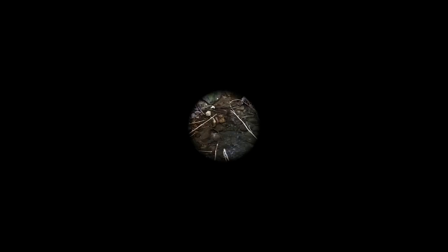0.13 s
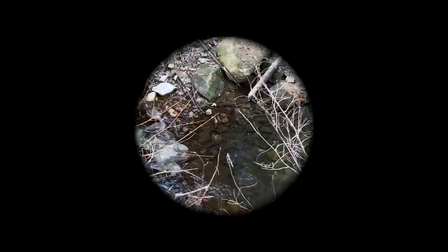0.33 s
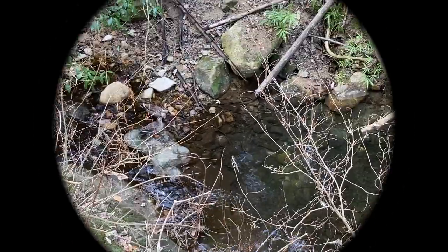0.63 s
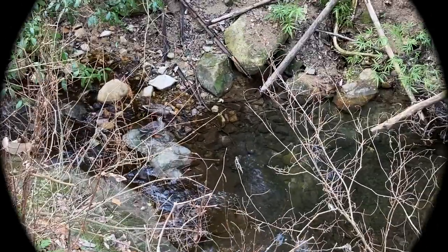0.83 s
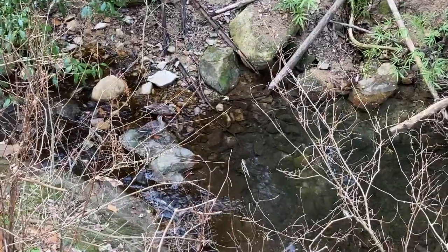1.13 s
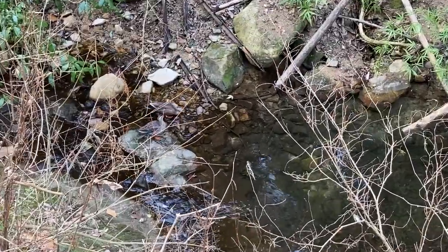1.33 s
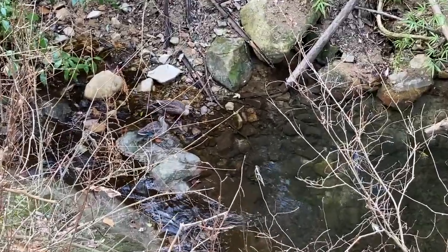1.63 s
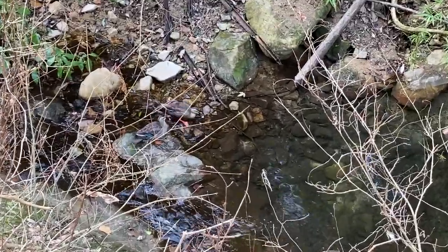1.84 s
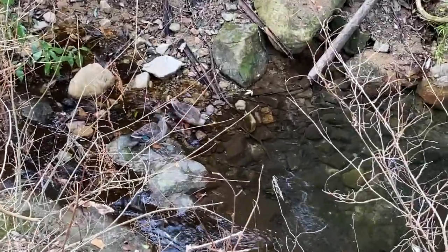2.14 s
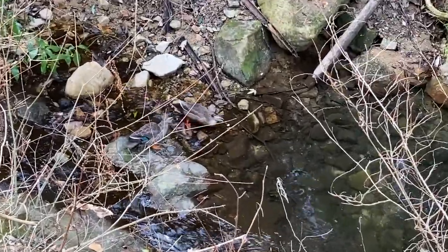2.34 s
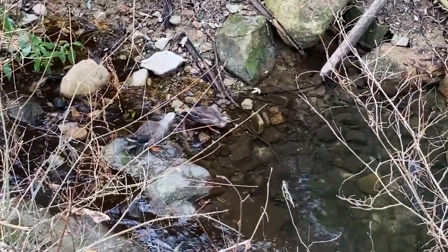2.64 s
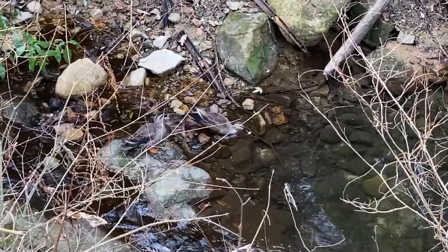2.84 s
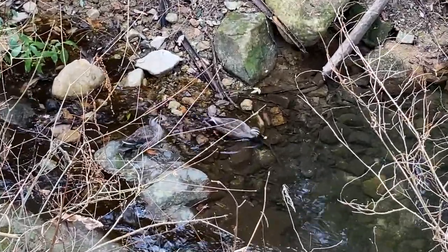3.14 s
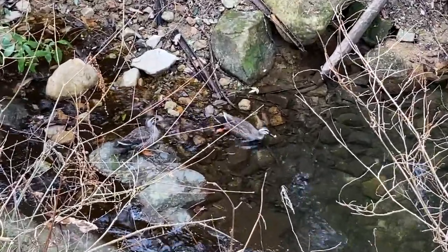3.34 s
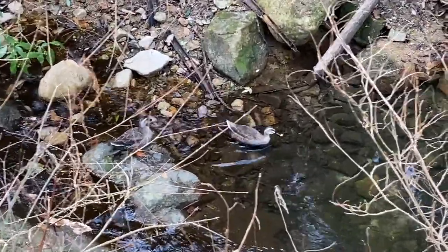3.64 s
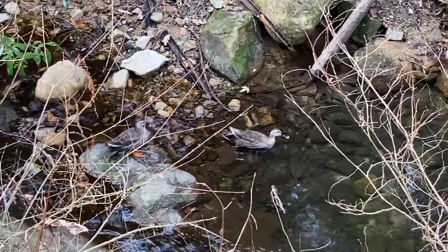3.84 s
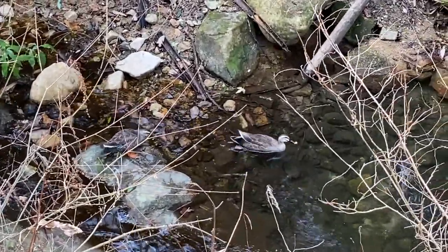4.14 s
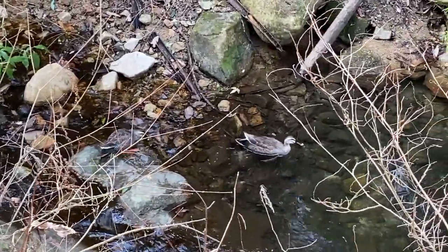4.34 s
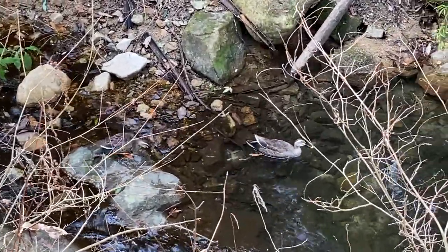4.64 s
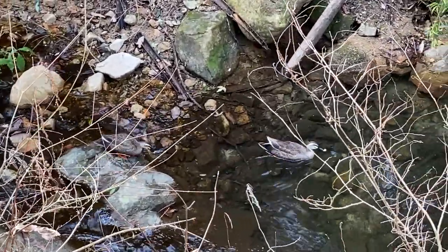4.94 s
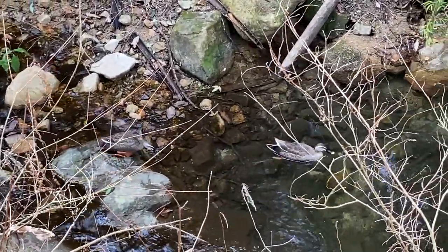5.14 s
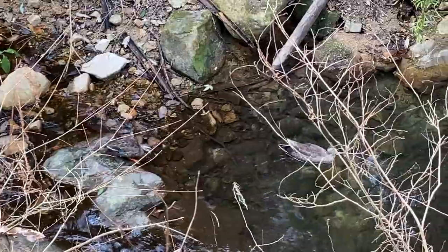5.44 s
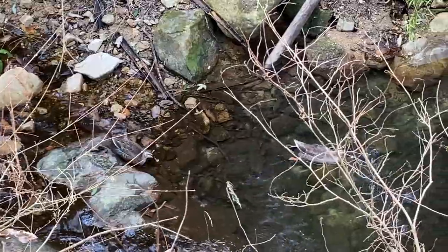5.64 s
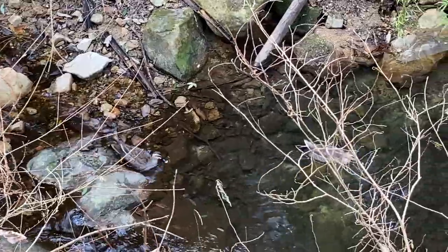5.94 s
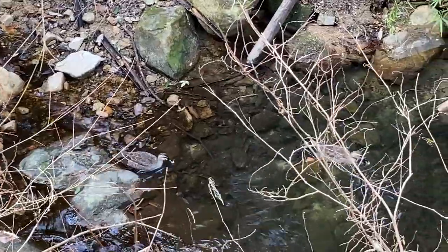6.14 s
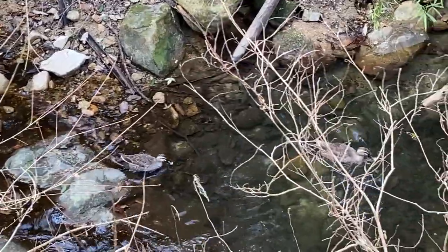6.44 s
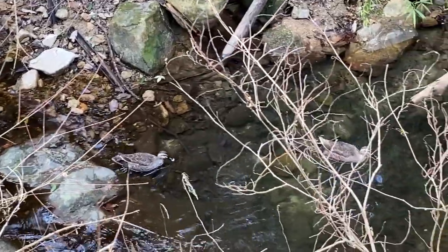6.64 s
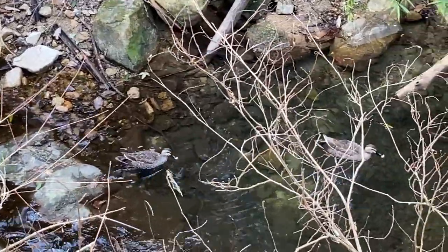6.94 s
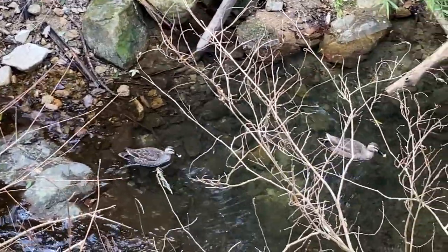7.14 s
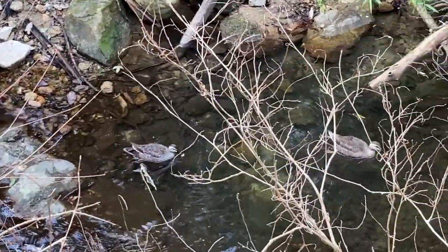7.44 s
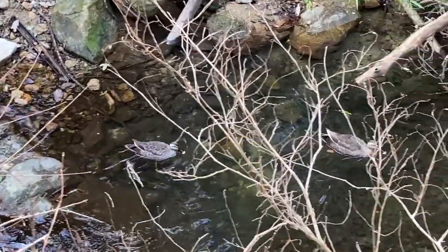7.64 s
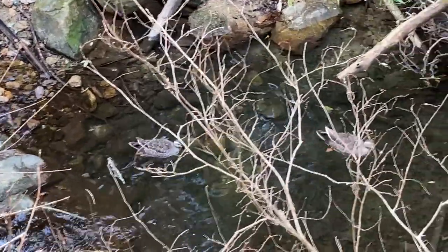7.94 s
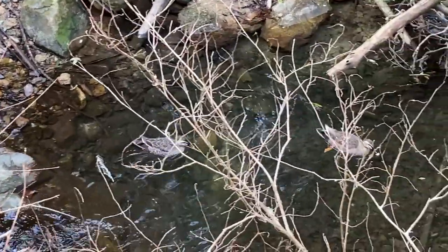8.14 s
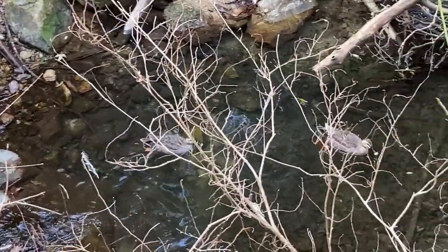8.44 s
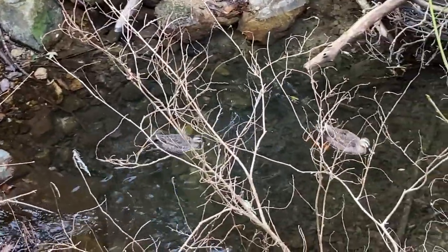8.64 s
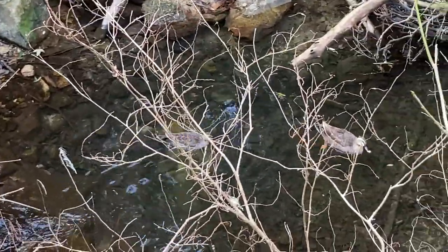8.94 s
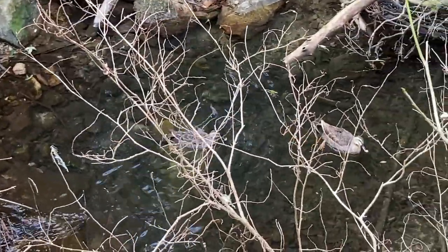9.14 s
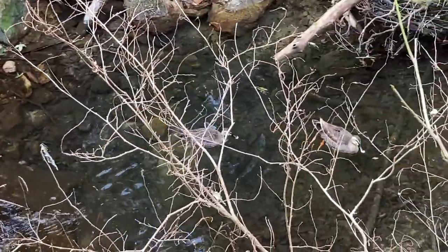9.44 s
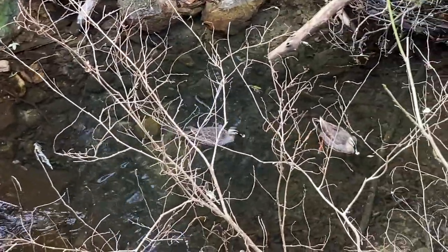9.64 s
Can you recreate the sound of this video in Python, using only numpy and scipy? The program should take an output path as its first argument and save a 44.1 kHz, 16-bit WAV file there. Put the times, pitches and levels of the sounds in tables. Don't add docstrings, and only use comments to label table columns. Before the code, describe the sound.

Water babbles and hisses over rocks, bubbles plopping and drops snapping, as a near bird chirps sharply and later gives a harsh cry.

```python
import sys
import numpy as np
from scipy import signal
from scipy.fft import rfft, irfft, next_fast_len
from scipy.io import wavfile
from scipy.ndimage import uniform_filter1d

SR = 44100
rng = np.random.default_rng(int(sys.argv[2]) if len(sys.argv) > 2 else 0)


def wav_record(signal):
    frames = np.transpose(np.atleast_2d(signal))
    bounded = np.clip(frames, -1, 1)
    quanta = np.round(bounded * 32767).astype(np.int16)
    wavfile.write(sys.argv[1], SR, quanta)


def invert_db(x):
    u = np.asarray(x, float) / 20
    return 10 ** u


N = 431298
TIME_S = np.arange(N) / SR

RUSH_DB, SPRAY_DB, HOLLOW_DB, WIND_DB = -42, -45.5, -43, -61
START_S, FADE_S, FADE_CURVE = 0.045, 4.51, 0.94
TRICKLE_HZ, TRICKLE_WIDTH_HZ = 2485, 960
HOLLOW_HZ, HOLLOW_WIDTH_HZ = 265.3, 23.5
HOLLOW_EVENNESS = 0.33
GULP_S = 0.032
CHIRP_PEAK_AT, CHIRP_SWELL = 0.31, 0.75
ARCH_HZ = 70
WOOD_T60_S = 0.45
WIND_LUMP_DB = 3
CUTOFF_HZ = 15750

# pitch_hz, density_db [dB per Hz]
RUSH_COLOUR = [(25, -36), (60, -11), (120, -5.5), (200, 0), (400, -7.5), (600, 1), (760, -3), (1100, 2.5),
               (2500, -1.5), (3050, -4), (4000, -1), (5200, -6)]
# pitch_hz, density_db [dB per Hz]
SPRAY_COLOUR = [(3000, -40), (5200, -1), (6500, 1.5), (9000, 7.5), (12500, -9.5), (14000, -1), (15700, 8.5)]
# start_s (centre), length_s, level_db
SURGES = [(.2, 0.25, -1), (1.24, 0.15, 1), (1.6, 0.4, 2), (2.42, 0.33, 2), (2.9, 0.084, 0.5),
          (3.27, 0.23, 2), (4.1, 0.06, 0.5), (4.38, 0.064, -1), (4.58, 0.043, -0.5), (5.0, 0.057, 1.5),
          (5.3, 0.064, 1), (5.8, 0.32, -1), (6.12, 0.075, 1), (6.5, 0.36, 0.5), (7.0, 0.037, 1),
          (7.2, 0.22, 0), (7.75, 0.17, 2), (8.23, 0.071, 1), (8.45, 0.077, 0), (8.77, 0.034, 3),
          (9.2, 0.14, 0.5), (9.7, 0.092, -0.5)]
# start_s, level_db
TRICKLE_LEVEL = [
    (0, -54),
    (.8, -54),
    (2.4, -62),
    (4.6, -50),
    (5.4, -46.5),
    (7.4, -40),
    (8.7, -37.5),
    (9.78, -37),
]
# start_s (centre), level_db
GULPS = [(2.33, 9.5), (3.33, 9), (4.1, 3.5), (5.17, 4), (5.5, 5), (5.78, 8), (6.24, 4), (6.36, 5.5),
         (6.6, 5.5), (7.42, 2), (7.92, 8), (8.19, 6), (8.72, 0.5), (8.83, 9), (8.92, 5.5), (9.27, 8.5),
         (9.4, 4), (1.54, 10), (3.2, 6), (4.64, -1), (5.04, 2.5), (5.25, 2), (5.64, 3.5), (6.74, 6.5),
         (7.12, 0), (8.47, 7.5), (8.6, 3), (8.77, 6.5), (9.05, 4.5), (9.54, 5)]
# start_s (centre), level_db
CHOKES = [(3.26, -6), (4.94, -25), (5.91, -3), (6.12, -18), (8.06, 3), (9.18, -8), (2.7, -6), (4.23, -5),
          (5.57, 0), (5.72, -9), (6.29, -3), (6.5, -5), (6.69, -8), (7.8, 3), (8.41, -6), (8.52, -8),
          (9.0, -1), (9.7, -7)]
# start_s, level_db (peak),
# pitch_hz
PLOPS = [(3.26, -26, 1440), (4.049, -30, 1190), (4.359, -23, 604), (4.559, -30, 610), (4.924, -25, 2160),
         (5.067, -23, 620), (6.044, -29, 1960), (6.636, -25, 1060), (6.997, -24, 1085), (7.599, -23, 2180),
         (7.783, -32, 1060), (8.235, -23.5, 1330), (8.922, -26, 1610), (9.558, -26, 1550),
         (3.695, -33, 500), (3.985, -32, 656), (4.684, -31, 780), (5.373, -36, 550),
                (5.62, -36, 605), (5.655, -33, 605), (6.27, -32, 542), (6.384, -29, 840), (6.531, -31, 563),
                (6.604, -33, 650), (6.951, -31, 600), (7.086, -34, 550), (7.463, -29, 560),
                (7.565, -34, 597), (7.661, -33, 660), (8.205, -29, 670), (8.264, -30, 605),
                (8.407, -28, 775), (8.434, -37, 550), (8.754, -33, 605), (8.766, -32, 820),
                (8.828, -32, 605), (9.366, -31, 605), (9.453, -37, 605),
         (1.2, -34, 2100), (3.968, -37, 2100), (3.992, -33, 2500), (4.523, -33, 2480),
                (4.727, -28, 1000), (4.851, -30, 1180), (5.151, -32, 1005), (5.337, -28, 1925),
                (5.368, -30, 2670), (6.122, -31, 950), (6.162, -23, 2840), (6.349, -26, 2155),
                (6.667, -29, 1410), (7.168, -23, 2480), (7.185, -31, 1465), (7.293, -30, 1065),
                (7.404, -31, 1005), (7.729, -26, 1925), (8.495, -29.5, 1130), (8.733, -22, 2140),
                (9.275, -26, 2020), (9.295, -22, 2500), (9.369, -24, 1640), (9.421, -31, 2785)]
# start_s, level_db (peak), pitch_hz
DRIPS = [
    (2.035, -34, 5500),
    (3.078, -34, 1800),
    (3.245, -30, 2150),
    (3.262, -35, 1800),
    (3.285, -33, 2140),
    (3.315, -33, 2000),
    (3.27, -32, 2130),
    (3.415, -39, 963),
    (5.236, -24, 5600),
    (9.7, -41, 5200),
]
# start_s, level_db (peak), pitch_hz
SNAPS = [(1.3594, -40, 8100), (2.315, -27, 8600), (2.4246, -24, 8400), (3.3493, -24, 6860),
         (4.277, -24, 8960), (5.0564, -25, 7700), (6.0177, -21, 9600), (6.771, -22, 8760),
         (8.244, -19, 7900), (8.3492, -17, 7900), (8.4467, -25, 7270), (8.739, -23, 7500)]
# start_s, level_db (peak), pitch_hz
TICKS = [(0.413, -56, 15400), (1.3528, -42, 14500), (1.8876, -42, 15100), (1.9664, -43, 15500),
         (2.1849, -40, 15200), (2.5277, -31, 14700), (2.6878, -38, 15200), (2.7576, -35, 15100),
         (3.1464, -39, 15200), (3.2789, -35, 12800), (3.9489, -36, 15600), (3.9993, -37, 15500),
         (4.1555, -36, 13000), (4.6583, -35, 12700), (5.6451, -33, 15400), (5.8391, -34, 15300),
         (6.3314, -36, 15200), (6.3719, -40, 13000), (6.77, -31, 15300), (6.9965, -32, 14900),
         (7.5854, -35, 15400), (8.5535, -35.5, 15200), (9.0698, -33, 15600), (9.2174, -36, 14700),
         (9.6245, -29, 15400)]
# start_s, length_s, first_hz, last_hz, level_db
CHIRPS = [(3.033, .014, 3120, 3200, -46), (3.042, 0.026, 3340, 3410, -37),
          (3.076, 0.022, 3430, 3340, -28.5), (3.1, .008, 3320, 3300, -37), (3.109, .011, 3200, 3150, -39),
          (3.14, .035, 3390, 3400, -47), (6.816, 0.051, 3300, 3400, -32), (6.85, .012, 2950, 3120, -29),
          (6.862, 0.019, 3160, 3360, -17.5), (6.878, 0.048, 3390, 3420, -18.5),
          (6.923, 0.0072, 3400, 3400, -26), (6.94, .009, 3390, 3350, -21), (6.947, 0.015, 3340, 3220, -27),
          (6.959, 0.0097, 3280, 3430, -32), (8.504, 0.039, 3700, 3740, -40)]
# start_s, pitch_hz, level_db
CRY = [
    (7.52, 4120, -44),
    (7.67, 4150, -36.5),
    (7.72, 4060, -33.5),
    (7.8, 4110, -30.5),
    (7.88, 4030, -34),
    (7.979, 4120, -28),
    (8.06, 4015, -27.5),
    (8.13, 4020, -49),
    (8.27, 4076, -39.5),
]
# multiple [of the loudest partial], level_db
CHIRP_PARTIALS = [(1, 4.5), (1.5, -22), (2, -17), (3, -21), (3.5, -20), (4, -22)]
# multiple [of the loudest partial], level_db
CRY_PARTIALS = [(1, 4), (1.5, -10), (2, -8.5), (2.5, -15), (3, -13)]
# start_s, lag_turns
PERCH = [
    (3.2, -.16),
    (6.8, 0.085),
    (7.0, 0.067),
    (7.5, -0.032),
]
# start_s, length_s, first_hz, last_hz, level_db
FAR_NOTES = [(1.82, 0.11, 3450, 3520, -51), (1.9, 0.06, 4400, 4460, -50), (2.03, .07, 4400, 4430, -54),
             (2.37, 0.09, 4800, 4800, -48), (3.163, 0.058, 4420, 4450, -46),
             (3.42, 0.13, 3930, 3910, -48.5), (3.545, 0.19, 3920, 3920, -47.5),
             (3.71, 0.03, 4450, 4420, -42), (3.755, .06, 4450, 4450, -53), (3.75, 0.11, 3920, 3850, -48.5),
             (3.73, .06, 3620, 3630, -51), (3.795, 0.057, 3650, 3680, -45), (3.86, 0.21, 3750, 3640, -48),
             (4.53, 0.084, 4350, 4020, -54), (4.64, 0.15, 4120, 4050, -48.5), (4.77, 0.19, 3950, 3850, -50),
             (5.07, .085, 3720, 3750, -45), (5.185, 0.069, 3630, 3630, -50), (5.28, 0.04, 3630, 3600, -48),
             (5.33, 0.027, 3640, 3620, -40), (5.41, 0.07, 3680, 3780, -47), (5.265, .07, 4230, 4180, -49),
             (4.915, 0.04, 3480, 3460, -38.5), (4.95, 0.04, 3250, 3100, -43),
             (5.74, 0.11, 3440, 3440, -44.5), (6.12, 0.121, 3440, 3410, -47.5),
             (6.435, 0.04, 3530, 3560, -45), (6.67, .04, 3950, 3950, -46), (6.99, 0.023, 3400, 3450, -47),
             (7.05, 0.055, 3380, 3320, -45), (8.025, 0.12, 3490, 3400, -47.5),
             (8.162, .058, 3350, 3020, -48), (8.77, 0.054, 4080, 4230, -41), (9.15, .05, 3620, 3590, -50),
             (9.285, 0.05, 3560, 3560, -45), (9.41, 0.088, 3860, 3860, -38.5),
             (9.51, 0.087, 3800, 3800, -50), (7.49, 0.064, 3650, 3870, -46.5)]
# start_s, length_s, first_hz,
# last_hz, level_db
FAR_SWEEPS = [(1.0, .055, 4750, 5500, -54), (1.955, .018, 4450, 3800, -50), (2.24, .04, 4600, 5500, -52),
              (2.27, .06, 4200, 4300, -53), (2.335, .016, 4380, 4520, -43), (2.523, .012, 4450, 4000, -45),
              (2.565, .05, 4150, 4850, -48), (2.608, .022, 4850, 4700, -43), (2.63, .025, 4700, 4450, -49),
              (2.655, .03, 4150, 4500, -45), (2.685, .028, 4600, 5000, -47), (2.735, .015, 4550, 4900, -50),
              (2.784, .012, 4100, 4350, -48), (3.31, .012, 2200, 3100, -46), (3.5, .05, 4400, 4850, -51),
              (7.44, .1, 5350, 5650, -52), (9.3, .08, 3850, 4150, -48), (9.375, .07, 4350, 4950, -45),
              (9.41, .04, 5150, 5250, -50), (9.445, .035, 5050, 5150, -40), (9.47, .06, 5300, 5950, -43),
              (9.5, .09, 5600, 5900, -47), (9.49, .07, 5000, 5350, -49)]
# start_s, length_s, first_hz, last_hz, level_db
BLURRED_CALLS = [(1.43, .3, 4280, 4280, -59), (2.36, 0.14, 4400, 4310, -57), (3.56, 0.12, 4550, 4330, -52),
                 (4.72, .13, 4700, 4610, -53.5), (4.86, 0.1, 4580, 4530, -51.5),
                 (5.01, .07, 4550, 4580, -53), (6.75, 0.09, 4460, 4600, -50),
                 (6.84, 0.035, 4500, 4570, -46), (6.95, .04, 4320, 4500, -51),
                 (7.12, 0.42, 4190, 4350, -51.5), (7.63, 0.095, 4480, 4400, -43.5),
                 (8.45, 0.11, 5360, 5110, -59)]
# start_s (centre), length_s, level_db
GUSTS = [(.68, 0.13, 13), (.9, 0.075, -20), (1.08, .08, 9), (1.25, 0.13, -9), (1.6, 0.099, 22),
         (1.8, 0.036, -4), (2.04, .12, 7), (2.28, 0.074, -6), (2.8, 0.13, 7), (2.97, 0.082, -14),
         (3.5, .2, 2), (3.9, 0.18, 2.5), (4.4, .1, 0), (4.66, 0.085, 3), (5.0, 0.045, 15),
         (5.14, 0.064, -2), (5.36, 0.052, 6), (5.56, 0.066, 8), (5.86, 0.1, -16), (6.3, .25, 0),
         (6.9, 0.091, 8), (7.15, 0.2, -10), (7.4, 0.15, 14), (7.75, 0.18, 6.5), (8.15, .2, -4),
         (8.6, 0.078, 10), (8.85, .06, -1), (8.99, 0.043, 2), (9.3, 0.12, 11), (9.7, 0.12, 2)]
# start_s, level_db (peak), pitch_hz
BUMPS = [
    (1.552, -41, 102),
    (2.355, -63, 53.8),
    (4.972, -35, 70),
    (5.265, -55, 64.6),
    (5.532, -29, 62),
    (7.328, -41, 52.3),
    (7.803, -52, 86.1),
    (8.355, -49, 48.4),
    (8.564, -40, 39.6),
    (8.963, -48, 64.6),
]
# pitch_hz, likeness [0-1], lag_turns (right behind left), balance_db (left minus right)
PORTS = [(31.5, 0.1, -1.8, 15), (135, 0.27, 0.04, -2.5), (281, 1, -0.0024, -2), (416, 0, 0.045, -4),
         (710, 0.82, 0.31, -1), (1410, 0, 0.11, 1), (2680, 0.3, 0.32, -2), (3020, 0.59, 0.46, -0.5),
         (3450, 1, 0.28, -0.5), (4050, 0.93, 0.24, 0), (4620, 0.74, 0.29, -1), (5600, 0.79, 0.537, -0.5),
         (8830, 0.85, 0.996, 1.5), (11540, 0.99, 1.515, -1), (14900, 0.43, 2, 2)]
# pitch_hz, level_db
PORT_COLOUR = [(10000, 0), (12300, -1.5), (12900, 1.5), (13500, -6), (14300, -7), (15700, -1.5)]
# pitch_hz, level_db
STEREO_LIMIT = [(4900, -17), (5200, -8.5), (6300, -7), (7600, -2.5), (9800, -7.5), (11000, -7.5),
                (12600, -1), (13300, -3), (13700, 3), (16000, 8)]


def stream():
    surge_db = swells(SURGES) + 0.27 * drift(24.0) + 0.5 * drift(38)
    out = fade() * (rush(surge_db) + trickle() + spray(surge_db) + hollow())
    add_bubbles(out, PLOPS, -2.0, cycles=33.0, rise=0.098)
    add_bubbles(out, DRIPS, 0, cycles=74, rise=0.091)
    add_bubbles(out, SNAPS, -2.0, cycles=33, rise=0.064)
    add_bubbles(out, TICKS, 7.0, cycles=32, rise=0.05)
    return out


def rush(surge_db):
    water = invert_db(6.0) * churned_noise(RUSH_COLOUR, 34.9, 6090, surge_db, patchy_db=2.0)
    water += invert_db(-3.0) * bubbling(count=1200, low_hz=455.8, high_hz=1927, spread_db=1.5, cycles=37.6)
    return invert_db(RUSH_DB) * water


def trickle():
    patter = resonance(rng.standard_normal((2, N)), TRICKLE_HZ, TRICKLE_WIDTH_HZ)
    fine = invert_db(-2.5) * resonance(patter, TRICKLE_HZ, TRICKLE_WIDTH_HZ)
    fine += invert_db(-8) * bubbling(count=900, low_hz=1694, high_hz=2690, spread_db=0.0, cycles=47.5)
    level_db = np.interp(TIME_S, *np.transpose(TRICKLE_LEVEL)) + 2.15 * drift(9.1)
    return invert_db(level_db) * fine


def spray(surge_db):
    mist = invert_db(7) * churned_noise(SPRAY_COLOUR, 2920, 17280, surge_db, patchy_db=1.27)
    mist += invert_db(-5) * bubbling(count=900, low_hz=6300, high_hz=11100, spread_db=2.0, cycles=26)
    mist += invert_db(-6.5) * bubbling(count=900, low_hz=12600, high_hz=15600, spread_db=0.5, cycles=30)
    return invert_db(SPRAY_DB) * mist


def hollow():
    inflow = rng.standard_normal((2, N)) * invert_db(2.9 * drift(13.0))
    hum = resonance(inflow, HOLLOW_HZ, HOLLOW_WIDTH_HZ)
    power = uniform_filter1d(hum ** 2, size=900, axis=1)
    hum = rms_one(hum / (power + 0.01) ** (HOLLOW_EVENNESS / 2))
    level_db = HOLLOW_DB + swells([(s, GULP_S, db) for s, db in GULPS + CHOKES])
    return invert_db(level_db) * hum


def churned_noise(spectrum, low_hz, high_hz, together_db, patchy_db):
    edges = np.geomspace(low_hz, high_hz, int(2.5 * np.log2(high_hz / low_hz)))
    white = rng.standard_normal((2, 2, N))
    out = 0
    for k, (low, high) in enumerate(zip(edges, edges[1:])):
        band_filter = signal.butter(2, [low, high], "band", fs=SR, output="sos")
        band = signal.sosfilt(band_filter, white[k % 2])
        band_db = at_hz(spectrum, np.sqrt(low * high))
        out = out + drift(14.0, lambda v: invert_db(band_db + patchy_db * v)) * band
    return rms_one(out * invert_db(together_db))


def bubbling(count, low_hz, high_hz, spread_db, cycles):
    out = np.zeros((2, N))
    for when, size, strength, side in rng.random((count, 4)):
        gain = invert_db(-spread_db * np.log(1 - 0.99 * strength))
        hz = low_hz * (high_hz / low_hz) ** size
        add(out[int(side * 2)], when * N / SR, gain * bubble(hz, cycles, rise=0.265))
    return rms_one(out)


def bubble(hz, cycles, rise):
    t = np.arange(int(SR * cycles / hz)) / SR
    life = t * hz / cycles
    tone = np.sin(2 * np.pi * hz * t * (1 + rise * life / 2))
    return tone * np.minimum(life * 12, 1) * invert_db(-40 * life)


def add_bubbles(out, events, trim_db, cycles, rise):
    for when, peak_db, hz in events:
        add(out, when, invert_db(peak_db + trim_db) * bubble(hz, cycles, rise))


def near_bird():
    out = np.zeros((2, N))
    wobble, flutter = drift(107.0), 3.1 * drift(110)
    for start, length, first_hz, last_hz, level_db in CHIRPS:
        life, hz = glide(length, first_hz, last_hz)
        arc = np.interp(life, [0, CHIRP_PEAK_AT, 1], [0, 1, 2])
        level = invert_db(level_db) * np.abs(np.sin(np.pi / 2 * arc)) ** CHIRP_SWELL
        turns = np.interp(start, *np.transpose(PERCH))
        add(out, start, voice(start, hz, level, CHIRP_PARTIALS, 30 * wobble, 0.25 * flutter, turns))
    s, pitch_hz, level_db = np.transpose(CRY)
    t = np.arange(s[0], s[-1], 1 / SR)
    hz, level = np.interp(t, s, pitch_hz), invert_db(np.interp(t, s, level_db))
    add(out, s[0], voice(s[0], hz, level, CRY_PARTIALS, 54 * wobble, flutter, PERCH[-1][1]))
    return out


def far_birds(calls, wobble_hz, flutter_db):
    out = np.zeros((2, N))
    wobble, flutter = wobble_hz * drift(92), flutter_db * drift(38)
    partials = [(1, 5), (1.5, -10.0), (2, -27)]   # multiple, dB
    for start, length, first_hz, last_hz, level_db in calls:
        life, hz = glide(length, first_hz, last_hz)
        level = invert_db(level_db) * np.abs(np.sin(np.pi * life)) ** 0.094
        add(out, start, voice(start, hz, level, partials, wobble, flutter))
    return out


def voice(start, hz, level, partials, wobble, flutter, turns=0):
    span = slice(int(start * SR), int(start * SR) + len(hz))
    phase = 2 * np.pi * np.cumsum(hz + wobble[span]) / SR
    tone = 0
    for k, db in partials:
        lag = [[0], [2 * np.pi * turns * (k == 1)]]
        tone = tone + invert_db(db) * np.sin(k * phase - lag)
    return np.sqrt(2) * tone * level * invert_db(flutter[span])


def glide(length, first_hz, last_hz):
    life = np.linspace(0, 1, int(length * SR))
    return life, first_hz + (last_hz - first_hz) * life + ARCH_HZ * np.sin(np.pi * life)


def wood(x):
    t = np.arange(SR // 2) / SR
    tail = rng.standard_normal((2, SR // 2)) * invert_db(-60 * t / WOOD_T60_S) * np.minimum(t / 0.014, 1)
    tail = tail / np.sqrt(np.sum(tail ** 2) / 2)
    return signal.oaconvolve(x[None], tail, axes=1)[:, :N]


def wind():
    rumble_filter = signal.butter(2, [38, 90], "band", fs=SR, output="sos")
    low = signal.sosfilt(rumble_filter, rng.standard_normal((2, N)))
    pushed = np.array([low[0], 1.53 * low[1] - 0.35 * low[0]])
    pushed = rms_one(pushed * invert_db(2.0 * drift(7.6)))
    level_db = WIND_DB + WIND_LUMP_DB * drift(1.6) + swells(GUSTS)
    out = invert_db(5.5) * pushed * fade() * invert_db(level_db)
    for when, peak_db, hz in BUMPS:
        bump = invert_db(peak_db) * bubble(hz, cycles=4.0, rise=-0.2)
        add(out, when, bump * [[-invert_db(-10)], [invert_db(12.5)]])
    return out


def ports(water, birds):
    size = next_fast_len(N + 4096)
    hz = np.arange(size // 2 + 1) * SR / size
    at, likeness, turns, balance_db = np.transpose(PORTS)
    alike = np.clip(np.interp(hz, at, likeness), 0, 1)
    late = np.exp(-2j * np.pi * np.interp(hz, at, turns))
    tilt = invert_db(np.interp(hz, at, balance_db) / 2)
    colour = invert_db(at_hz(PORT_COLOUR, hz + 1))
    direct, own, call_left, call_right = rfft([*water, *birds], size) * colour
    left = direct + call_left
    right = late * (alike * direct + call_right) + np.sqrt(1 - alike ** 2) * own
    return irfft([left * tilt, right / tilt], size)[:, :N]


def thin_stereo(x):
    middle_side = [x[0] + x[1], x[0] - x[1]]
    hz, _, frames = signal.stft(middle_side, SR, window="cosine", nperseg=2048)
    bands = np.abs(frames[:, :1024].reshape(2, 64, 16, -1)) ** 2
    power = uniform_filter1d(bands.sum(axis=2), size=2, axis=2)
    power = np.repeat(power, 16, axis=1)
    limit = invert_db(2 * at_hz(STEREO_LIMIT, hz[:1024] + 1))[:, None]
    frames[0, :1024] *= (power[0] > limit * power[1]) | (hz[:1024, None] > 13200)
    frames[1, :1024] *= power[1] > limit * power[0]
    frames = frames * (hz < CUTOFF_HZ)[:, None]
    middle, side = signal.istft(frames, SR, window="cosine", nperseg=2048)[1][:, :N]
    return np.array([middle + side, middle - side]) / 2


def fade():
    return np.minimum(TIME_S / FADE_S, 1) ** FADE_CURVE


def swells(rows):
    t = np.arange(0, N + 64, 64) / SR
    curve = sum(db * np.exp(-((t - s) / length) ** 2) for s, length, db in rows)
    return np.interp(TIME_S, t, curve)


def drift(rate, shape=np.asarray):
    r = np.exp(-40 * np.pi * rate / SR)
    noise = rng.standard_normal(N // 20 + 2002)
    slow = signal.lfilter([1], [1, -2 * r, r * r], noise)[2000:]
    return np.interp(np.arange(N) / 20, np.arange(len(slow)), shape(rms_one(slow)))


def resonance(x, hz, width_hz):
    r, w = np.exp(-np.pi * width_hz / SR), 2 * np.pi * hz / SR
    return rms_one(signal.lfilter([1, 0, -1], [1, -2 * r * np.cos(w), r * r], x))


def at_hz(points, hz):
    at, level_db = np.transpose(points)
    return np.interp(np.log(hz), np.log(at), level_db)


def rms_one(x):
    return x / np.sqrt(np.mean(x ** 2) + 1e-20)


def add(track, s, sound):
    i = int(s * SR)
    track[..., i:i + sound.shape[-1]] += sound[..., :N - i]


def scene():
    near = near_bird()
    far = far_birds(FAR_NOTES, wobble_hz=60, flutter_db=4)
    far += far_birds(FAR_SWEEPS, wobble_hz=75, flutter_db=3)
    blurred = far_birds(BLURRED_CALLS, wobble_hz=190, flutter_db=3.5)
    echoes = wood((invert_db(-18) * near + invert_db(-6) * far + invert_db(-2) * blurred)[0])
    birds = invert_db(-3.5) * near + invert_db(-3.0) * far + blurred + echoes
    return ports(stream(), birds) + wind()


def band_limit(x):
    return signal.sosfilt(signal.butter(12, 17070, fs=SR, output="sos"), x)


def record(dry):
    opened = np.clip((TIME_S - START_S) / 0.02, 0, 1)
    return band_limit(thin_stereo(dry) * opened)


dry = scene()
out = record(dry)
wav_record(out)
```